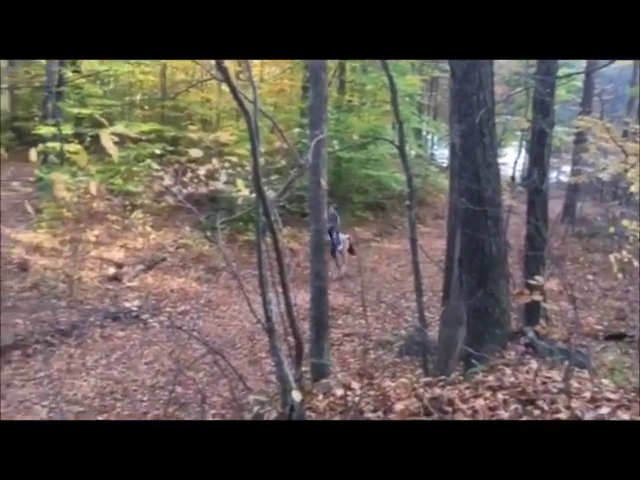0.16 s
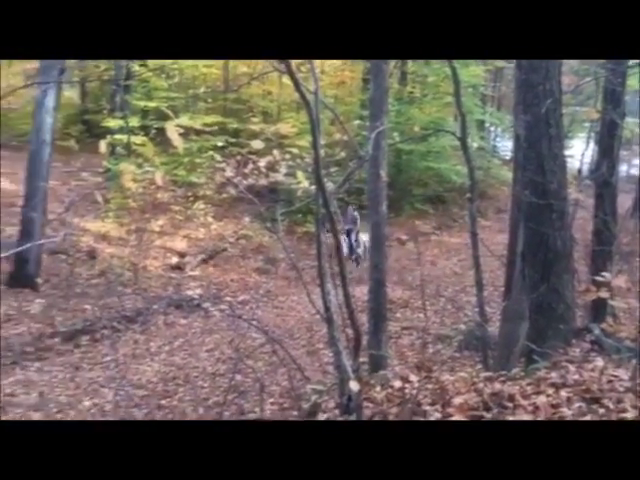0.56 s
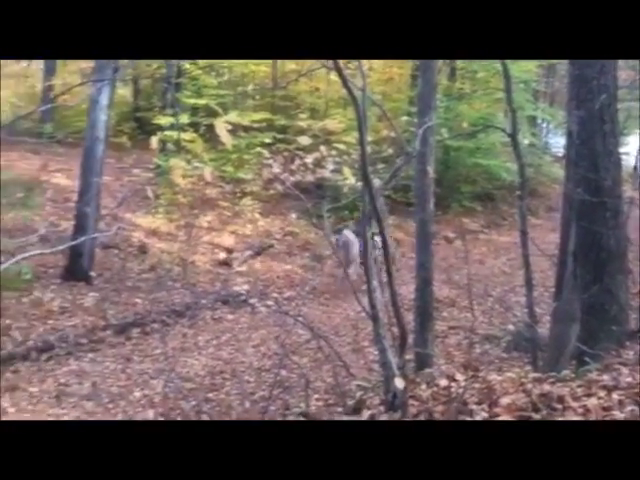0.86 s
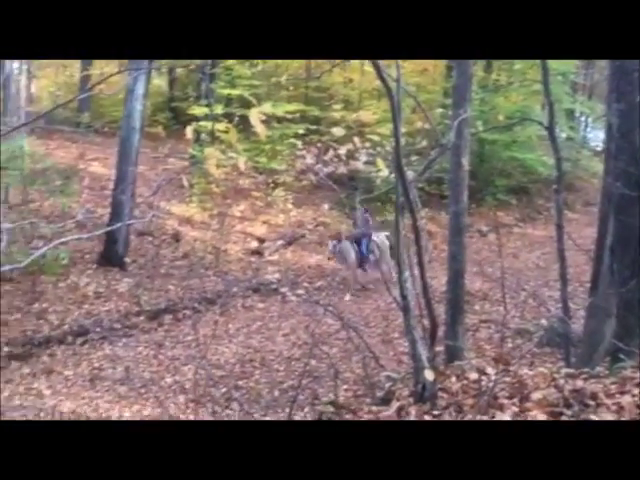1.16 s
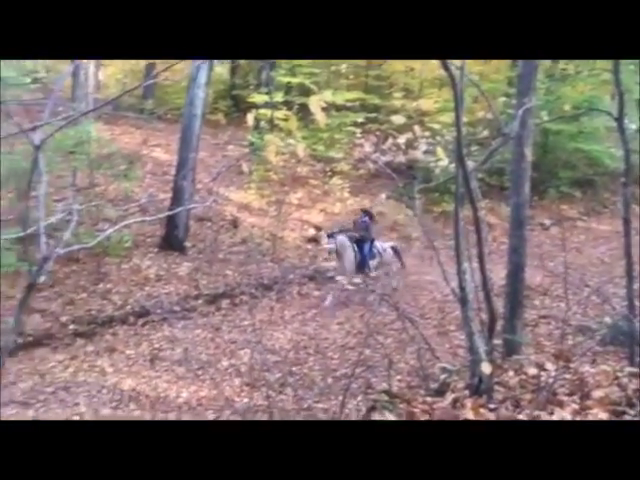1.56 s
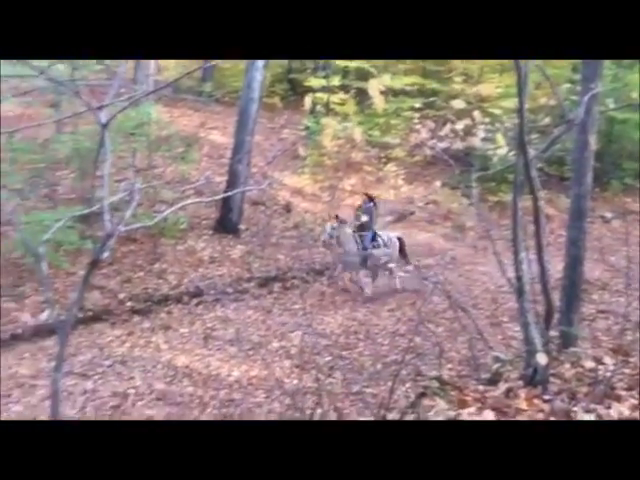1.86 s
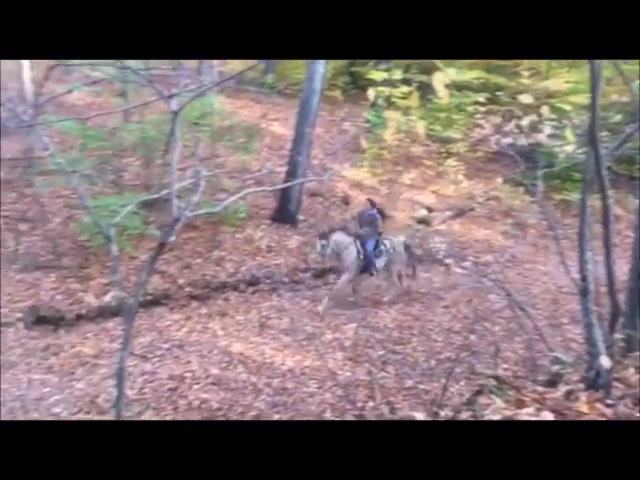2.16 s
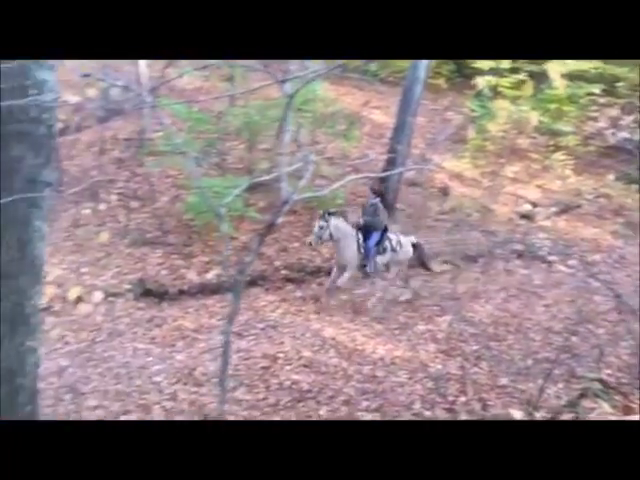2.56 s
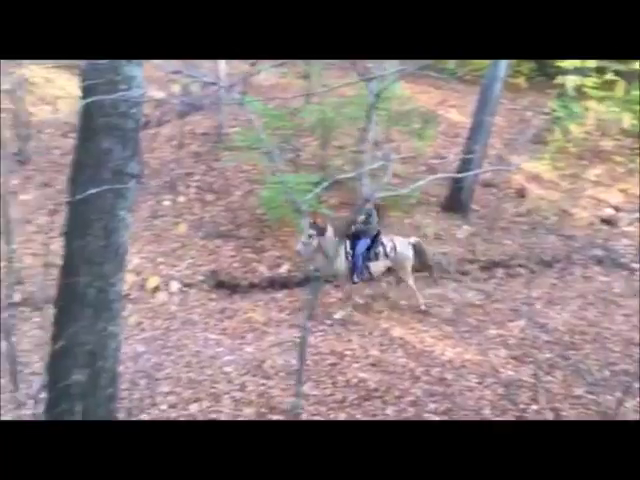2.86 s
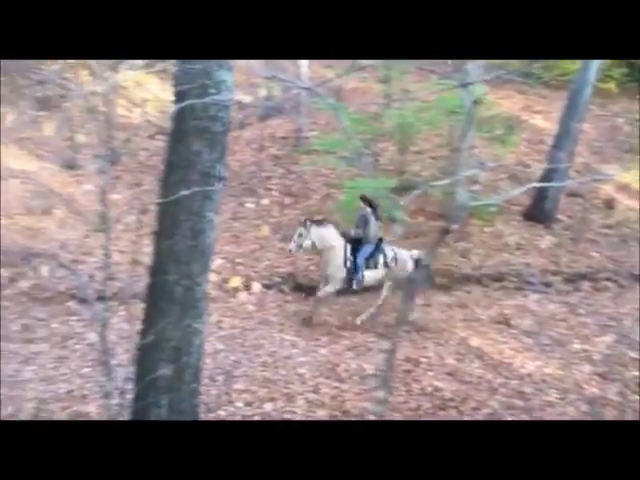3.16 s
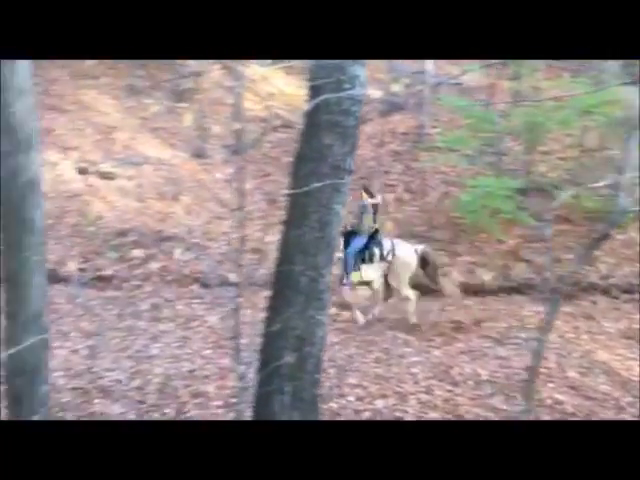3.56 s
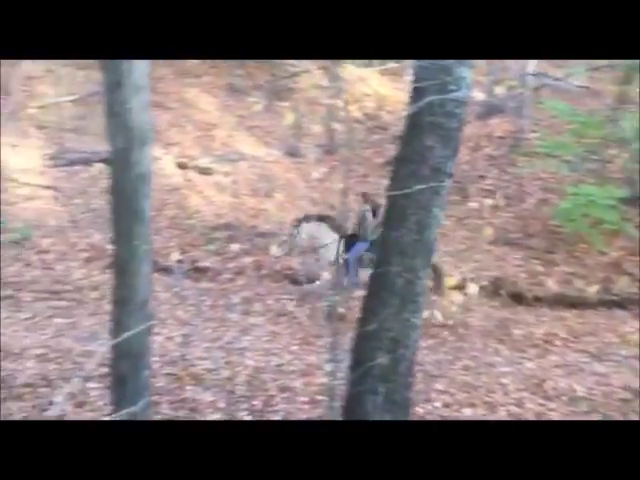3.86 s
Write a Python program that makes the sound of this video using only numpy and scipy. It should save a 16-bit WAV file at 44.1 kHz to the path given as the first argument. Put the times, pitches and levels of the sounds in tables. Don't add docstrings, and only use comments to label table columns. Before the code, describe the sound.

Horse hooves crunch through dry fallen leaves in a wood, growing louder as it approaches

```python
import sys
import numpy as np
from scipy import signal
from scipy.fft import rfft, irfft
from scipy.io import wavfile
from scipy.ndimage import uniform_filter1d

SR = 44100
rng = np.random.default_rng(int(sys.argv[2]) if len(sys.argv) > 2 else 0)


def generate_wav(signal):
    frames = np.transpose(np.atleast_2d(signal))
    scaled = np.clip(frames, -1, 1) * 32767
    pcm = np.round(scaled).astype(np.int16)
    wavfile.write(sys.argv[1], SR, pcm)


def nominal_scale(level):
    x = np.asarray(level, float) / 20
    return 10 ** x


N = 176400


def band(x, hz, width):
    low = max(hz - width / 2, 15)
    high = min(hz + width / 2, 0.45 * SR)
    return signal.sosfilt(signal.butter(2, [low, high], "band", fs=SR, output="sos"), x)


def unit(x):
    return x / np.sqrt(np.mean(x ** 2))


def walk(rate):
    hold = int(SR / rate)
    steps = np.repeat(rng.standard_normal(N // hold + 1), hold)
    return 1.19 * uniform_filter1d(uniform_filter1d(steps, hold), hold)[:N]


def level_at(spectrum, hz):
    table = np.array(spectrum)
    return np.interp(np.log(hz), np.log(table[:, 0]), table[:, 1])


def add(out, start_s, x, peak_db):
    i = int(start_s * SR)
    out[i:i + len(x)] += (x * nominal_scale(peak_db) / np.max(np.abs(x)))[:N - i]


def ring(t, hz, glide, t60, turn):
    tau = t60 / np.log(1000)
    fade = np.exp(-t / tau)
    cycles = hz * (t + glide * tau * (1 - fade))
    return fade * np.sin(2 * np.pi * (cycles + turn))


# (time [s], peak level [dB], pitch [Hz])
HOOF_THUDS = [(0.001, -48.5, 73.6), (0.085, -42.5, 120), (0.342, -45.5, 169), (0.521, -45, 150),
              (0.629, -41.5, 94.2), (0.883, -42, 94), (1.096, -37, 98.6), (1.258, -43.5, 225),
              (1.504, -41.5, 154), (1.567, -49, 265), (1.628, -42, 240), (1.725, -35, 265),
              (1.793, -31.5, 201), (1.925, -46, 230), (2.002, -44.5, 197), (2.055, -39.5, 225),
              (2.226, -32, 107), (2.372, -43, 155), (2.61, -47.5, 266), (2.807, -28.5, 249),
              (2.945, -29.5, 100.4), (3.205, -40, 154), (3.402, -33, 131), (3.526, -33, 298),
              (3.546, -38, 120), (3.786, -36.5, 117.4), (3.965, -33.5, 79)]


def thuds():
    out, t = np.zeros(N), np.arange(SR // 4) / SR
    rise_s, glide, roughness = 0.0039, 0.559, 0.88
    for start_s, peak_db, hz in HOOF_THUDS:
        t60 = 0.21 * (110 / hz) ** 0.8
        body = ring(t, hz * 0.879, glide, t60, rng.random())
        grit = unit(band(rng.standard_normal(len(t)), 196.0, 211.0)) * np.exp(-t / 0.026)
        add(out, start_s, (body + roughness * grit) * (1 - np.exp(-t / rise_s)), peak_db)
    return out


# (time [s], peak level [dB], pitch [Hz], swell [s])
GROUND_WOBBLES = [(0.1, -47, 80, 0.023), (0.361, -48, 80, 0.016), (0.53, -46, 84, .02),
                  (0.645, -46, 91, 0.014), (0.885, -43, 95, .012), (0.97, -47.5, 89, 0.013),
                  (1.12, -40.5, 79.5, 0.034), (1.269, -54, 90, 0.014), (1.34, -56, 80, 0.013),
                  (1.7, -44.5, 88, .04), (2.244, -44.5, 85, 0.027), (2.386, -49, 73.6, .015),
                  (2.83, -45.5, 90, .015), (2.955, -40, 90, 0.017), (3.209, -39.5, 132, 0.0059),
                  (3.41, -41, 109, 0.014), (3.545, -47, 98, 0.054), (3.796, -43, 107, 0.0095)]


def wobbles():
    out, t = np.zeros(N), np.arange(SR // 4) / SR
    for start_s, peak_db, hz, swell_s in GROUND_WOBBLES:
        swell = t * np.exp(-t / max(swell_s, 0.004))
        add(out, start_s, ring(t, hz * 0.857, 0.43, 0.27, rng.random()) * swell, peak_db)
    return out


# (time [s], peak level [dB], pitch [Hz])
FAR_KNOCKS = [(0.093, -38, 950), (0.343, -32, 925), (0.516, -29, 1100), (0.517, -35, 587),
              (0.627, -34.5, 970), (0.786, -37, 1750), (0.874, -31.5, 810), (0.92, -25.5, 1680),
              (0.965, -28.5, 1790), (1.076, -36, 1490), (1.117, -25, 1710), (1.256, -28, 1000),
              (1.34, -43, 510), (1.387, -32, 2040), (1.4965, -26, 1080), (1.566, -28.5, 1650),
              (1.567, -36.5, 440), (1.635, -38, 907), (1.734, -31, 614), (1.797, -15, 1054),
              (1.799, -24.5, 680), (1.83, -27, 1130), (2.009, -28, 683), (2.036, -40, 1310),
              (2.213, -37.5, 618), (2.218, -28, 1300), (2.232, -34, 613), (2.245, -33, 980),
              (2.377, -30.5, 760), (2.385, -30.5, 1650), (2.448, -33.5, 1000), (2.504, -29, 1010)]
# (time [s], peak level [dB], pitch [Hz])
CLOSE_KNOCKS = [(2.605, -21, 1180), (2.715, -27, 2300), (2.806, -21, 800), (2.824, -15.5, 925),
                (2.852, -24.5, 805), (2.943, -14, 1030), (2.953, -17.5, 1060), (2.971, -26, 634),
                (3.014, -34, 840), (3.192, -22, 1000), (3.2834, -28, 2300), (3.374, -25.5, 980),
                (3.396, -31, 840), (3.41, -36, 610), (3.447, -41, 1890), (3.497, -31, 1910),
                (3.529, -24, 910), (3.558, -17.5, 1840), (3.558, -26, 530), (3.603, -34.5, 880),
                (3.632, -36.5, 590), (3.759, -25.5, 1380), (3.9, -21, 1800), (3.9, -35, 544),
                (3.927, -25, 1900), (3.954, -27, 1045), (3.975, -30, 840)]


def knocks():
    out, t = np.zeros(N), np.arange(SR // 25) / SR
    cycles, glide = 3.4, 0.31
    for start_s, peak_db, hz in list(FAR_KNOCKS) + list(CLOSE_KNOCKS):
        t60 = cycles * 2.75 / hz
        body = ring(t, hz * 0.943, glide, t60, 0)
        overtone_hz = hz * (1.62 + 0.5 * rng.random())
        overtone = ring(t, overtone_hz, 0.21, t60 * 0.4, rng.random())
        rough = band(rng.standard_normal(len(t)), hz, hz * 1.1) * np.exp(-t / 0.0025)
        wood_hit = body + 0.88 * overtone + 0.76 * rough
        add(out, start_s, wood_hit * (1 - np.exp(-t / 0.0013)), peak_db)
    return out


# (time [s], peak level [dB], pitch [Hz])
STEM_SNAPS = [(0.371, -25.5, 7950), (0.408, -28.5, 4460), (0.7866, -30, 8700), (0.974, -26, 5530),
              (1.3891, -17, 12600), (1.4676, -28, 3890), (1.6395, -27.5, 3560), (1.6767, -22, 6300),
              (1.7988, -22, 3530), (1.9321, -28.5, 7160), (2.089, -22, 3200), (2.1457, -18.5, 4400),
              (2.376, -26.5, 5730), (2.4498, -27, 5040), (2.505, -29, 6060), (2.7157, -32, 3950),
              (2.806, -33, 6830), (3.0929, -25, 6900), (3.284, -20.5, 5320), (3.3058, -33, 4000),
              (3.358, -24.5, 4790), (3.375, -27, 3500), (3.4177, -25.5, 4530), (3.478, -37, 6640),
              (3.499, -21, 4800), (3.5592, -11, 4050), (3.7414, -24.5, 5450), (3.7605, -14, 5900),
              (3.9005, -20.5, 3660)]


def snaps():
    out, t = np.zeros(N), np.arange(SR // 50) / SR
    fade = nominal_scale(-60 * t / 0.0076) + 0.11 * np.exp(-t / 0.0065)
    for start_s, peak_db, hz in STEM_SNAPS:
        noise = rng.standard_normal(len(t))
        crack = band(noise, hz, hz * 0.47) + 0.32 * band(noise, 7500.0, 23000.0)
        add(out, start_s, crack * fade, peak_db)
    return out


def grains(per_s):
    hits = rng.random(N) < per_s / SR
    signs = np.sign(rng.standard_normal(N))
    spread_db = 8 * np.minimum(rng.exponential(size=N), 2.2)
    return unit(hits * signs * nominal_scale(spread_db))


# (time [s], peak level [dB], brightness [dB], decay [s])
LEAF_CRUNCHES = [(0.091, -26.5, -5.5, 0.016), (0.332, -25, 0.5, 0.064), (0.373, -21.5, -0.5, 0.018),
                 (0.512, -24.5, -5, 0.024), (0.626, -21, -7.5, 0.021), (0.787, -32, 1, 0.19),
                 (0.872, -23, -4, 0.061), (0.918, -17, -3, 0.054), (0.971, -12.5, -0.5, 0.021),
                 (1.079, -21.5, -3, 0.036), (1.255, -21.5, -4, 0.058), (1.388, -22, 2.5, 0.12),
                 (1.47, -24, -2.5, 0.1), (1.635, -23.5, -3.5, 0.1), (1.729, -26.5, -13, 0.028),
                 (1.832, -12, -2, 0.036), (2.032, -19, -0.5, 0.058), (2.09, -22, 4.5, 0.055),
                 (2.145, -28, 8.5, 0.035), (2.205, -19, -6.5, 0.041), (2.507, -21.5, 11.5, 0.03),
                 (2.607, -23.5, 3, 0.03), (2.804, -11.5, -2, 0.033), (2.938, -25, -7, 0.24),
                 (3.093, -20, 5, 0.3), (3.189, -20.5, -7, 0.038), (3.27, -23.5, -4.5, 0.095),
                 (3.353, -21, -7, 0.027), (3.378, -15, -3.5, 0.047), (3.56, -16, -0.5, 0.045),
                 (3.741, -15.5, 1.5, 0.056), (3.955, -18.5, -2.5, 0.18)]
# (time [s], level [dB])
LEG_SWEEP = [
    (0, -58.5),
    (.76, -63.5),
    (.82, -51.5),
    (1.6, -51),
    (2.1, -46.5),
    (3.1, -41),
    (4, -49.5),
]
# (frequency [Hz], level [dB per Hz])
LEAF_COLOUR = [(150, -38), (250, -12), (507, -14), (897, -6), (1950, -3), (2710, -7.5), (4390, -8),
               (8620, -10), (15500, -13)]


def leaves():
    t = np.arange(N) / SR
    sweep = nominal_scale(np.interp(t, *np.array(LEG_SWEEP).T) + 0.5 * walk(14))
    dull, bright = sweep ** 2, sweep ** 2
    rise_s, crunch_db = 0.004, -19.5
    for start_s, peak_db, tilt_db, decay_s in LEAF_CRUNCHES:
        d = t - start_s
        shape = np.exp(np.where(d < 0, d / rise_s, -d / max(decay_s, 0.005)) * 2)
        dull = dull + shape * nominal_scale(peak_db + crunch_db - tilt_db) ** 2
        bright = bright + shape * nominal_scale(peak_db + crunch_db + tilt_db) ** 2

    ragged_db, clump_db = 2.1, 2.8
    bright = np.sqrt(bright) * nominal_scale(ragged_db * walk(80))
    dull = np.sqrt(dull) * nominal_scale(ragged_db * walk(80) + clump_db * walk(30))

    grains_per_s, grain_db = 1500, 2
    shared = grains(grains_per_s)
    low, high, out = 0, 0, 0
    for hz in 400 * 2 ** np.arange(0, 5.4, 0.5):
        clicks = 0.43 * shared + 0.68 * grains(grains_per_s / 2)
        x = rng.standard_normal(N) + nominal_scale(grain_db) * clicks
        colour = np.sqrt(hz) * nominal_scale(level_at(LEAF_COLOUR, hz) + 0.36 * walk(25.44))
        x = unit(band(x, hz, hz * 0.61)) * colour
        share = np.clip(np.log2(hz / 1300) / 2, 0, 1)
        out = out + x * dull ** (1 - share) * bright ** share
        if hz < 2600:
            low = low + x
        else:
            high = high + x
    out = out + low.std() * flecks(521, 2570) * dull
    out = out + high.std() * flecks(2600, 14000) * bright
    return out / (low + high).std() * 0.85


def flecks(lo_hz, hi_hz):
    per_s, ring_cycles, level_db = 500, 9, -5
    pitch, size, when = rng.random((per_s * N // SR, 3)).T[:, :, None]
    hz = lo_hz * (hi_hz / lo_hz) ** pitch
    k, out = np.arange(400), np.zeros(N + 400)
    cycles = k * hz / SR
    fade = np.exp(-cycles / (ring_cycles / 3) * (1500 / hz) ** 0.5)
    rings = np.sin(2 * np.pi * cycles) * cycles * fade
    rings = rings / np.sqrt(np.sum(rings ** 2, axis=1, keepdims=True))
    rings = rings * np.sqrt(hz) * nominal_scale(level_at(LEAF_COLOUR, hz) + 10 * size ** 2)
    np.add.at(out, (when * N).astype(int) + k, rings)
    return unit(out[:N]) * nominal_scale(level_db)


# (frequency [Hz], level [dB per Hz])
AIR_COLOUR = [(15, -38), (25, 9), (86, 10), (322, -6.5), (826, -4), (15500, -24.5)]


def wood():
    out = 0
    for hz in 35 * 2 ** np.arange(0, 8.8, 0.5):
        x = unit(band(rng.standard_normal(N), hz, hz * 0.223))
        out = out + x * np.sqrt(hz) * nominal_scale(level_at(AIR_COLOUR, hz) + 2.5 * walk(7.8))
    return unit(out) * nominal_scale(-60)


def trunk_echo(x):
    t = np.arange(SR // 4) / SR
    echo_db, t60_s = -16, 0.093
    tail = band(rng.standard_normal(len(t)), 3500.0, 6750.0) * nominal_scale(-60 * t / t60_s)
    tail = tail * (t > 0.003)
    return nominal_scale(echo_db) * signal.fftconvolve(x, tail / np.sqrt(np.sum(tail ** 2)))[:N]


# (frequency [Hz], width [Hz], depth [0-1])
REFLECTION_DIPS = [
    (2863, 670, 0.51),
    (10430, 690, 0.48),
]


def ground_reflection(x):
    for hz, width, depth in REFLECTION_DIPS:
        x = x - np.clip(depth, 0, 1) * signal.lfilter(*signal.iirpeak(hz, hz / width, SR), x)
    return x


def scene():
    x = knocks() + snaps() + leaves()
    x = ground_reflection(x + trunk_echo(x))
    return (x + thuds() + wobbles() + wood())[None]


# (time [s], twice the share of spectrum kept [0-1], length [s])
THIN_MOMENTS = [(.122, .2, 0), (.238, .06, .016), (1.02, .2, 0), (1.852, .2, .006), (2.225, 0, .018),
                (2.683, .15, .004), (2.921, .08, .005), (3.212, .12, .005), (3.258, .25, 0),
                (3.345, .07, .006), (3.731, .07, .009), (3.834, .2, 0)]
LEFT_BANDS = {1.852: [620, 1130, 1810, 2050, 2960, 3200, 3350], 2.225: [170, 560, 680, 1220, 1380, 1960,
              8490, 9480], 3.212: [170, 950, 1600, 2500, 4600], 3.258: [1900, 2350], 3.345: [620, 1450,
              2350], 3.731: [1200, 1700, 2400, 4600, 6400]}


def thin_out(x):
    n, out = 2048, x.copy()
    fade_s, leak, kept_gain, band_gain = 0.011, nominal_scale(-45), 1.4, 3.6
    t, hz = (np.arange(n) - n / 2) / SR, np.fft.rfftfreq(n, 1 / SR)
    for middle_s, share, length_s in THIN_MOMENTS:
        i = int(middle_s * SR) - n // 2
        lines = rfft(x[i:i + n] * np.hanning(n) ** 0.5)
        size = np.abs(lines)
        strength = uniform_filter1d(size, size=3) / uniform_filter1d(size, size=61) ** 0.5
        strength = strength * (hz > 1500)
        limit = np.quantile(strength[hz < 15400], 1 - np.clip(share / 2, 0, 1))
        keep = np.where(strength > limit, kept_gain, leak)
        keep[hz < 200] = 0.6
        if middle_s in LEFT_BANDS:
            keep = np.where(hz > 4000, keep, leak)
            for centre in LEFT_BANDS[middle_s]:
                near = np.abs(hz - centre) < 50
                middle_size = size[(hz > 500) & (hz < 2500)].mean()
                even = np.sqrt(middle_size / size[near].mean())
                keep = np.where(near, band_gain * even if centre > 300 else 1, keep)
        blend = np.clip((length_s / 2 + fade_s - np.abs(t)) / fade_s, 0, 1)
        blend = np.sin(np.pi / 2 * blend) ** 2
        out[i:i + n] += blend * (irfft(lines * keep, n) - out[i:i + n])
    return out


def low_pass(x):
    return signal.sosfilt(signal.butter(12, 16590, fs=SR, output="sos"), x)


def record(dry):
    x = signal.sosfilt(signal.butter(2, 55, "high", fs=SR, output="sos"), dry[0])
    below_top = signal.sosfilt(signal.ellip(10, 0.2, 70, 15400, fs=SR, output="sos"), x)
    over_top = band(x, 16200.0, 1100.0)
    loud = np.clip(uniform_filter1d(np.abs(over_top), size=200) / 0.006, 0, 1) ** 3
    mix = thin_out(below_top + 0.082 * loud * over_top)[None]
    return low_pass(mix)


dry = scene()
out = record(dry)
generate_wav(out)
```